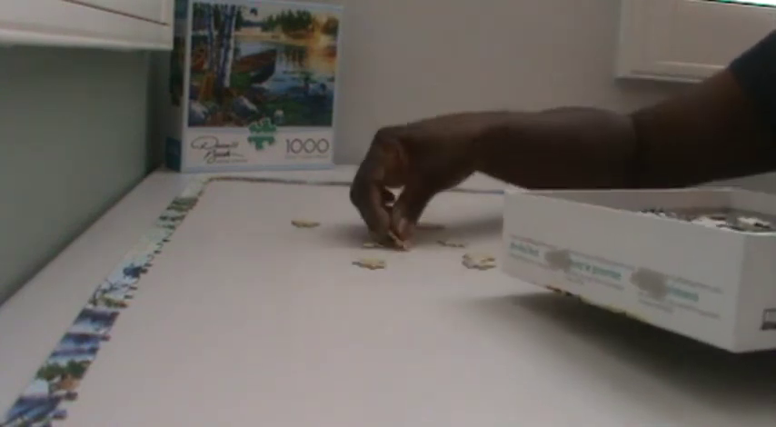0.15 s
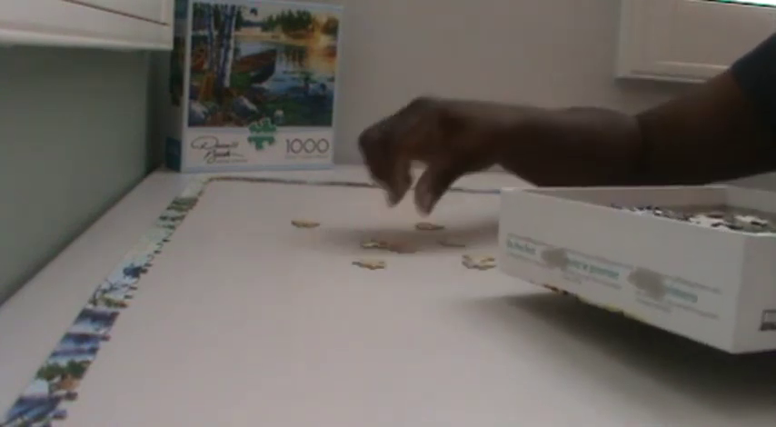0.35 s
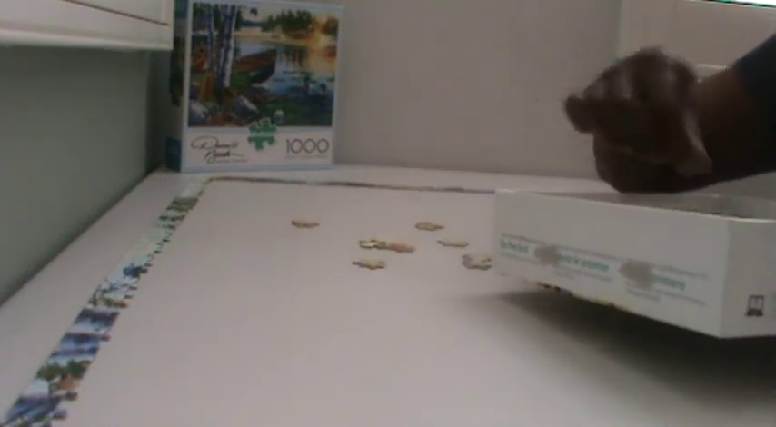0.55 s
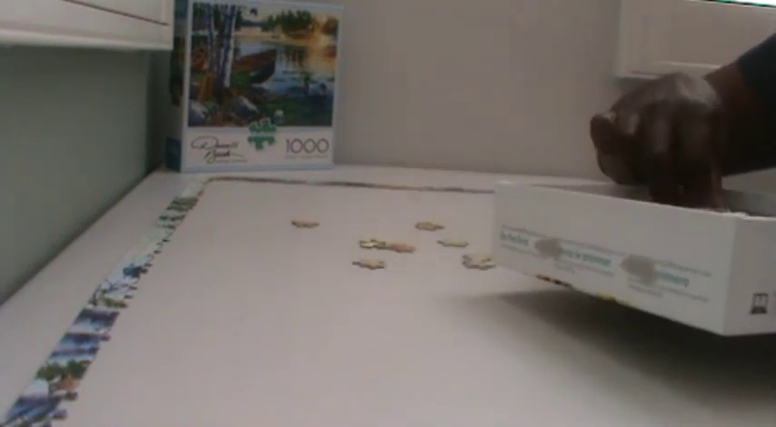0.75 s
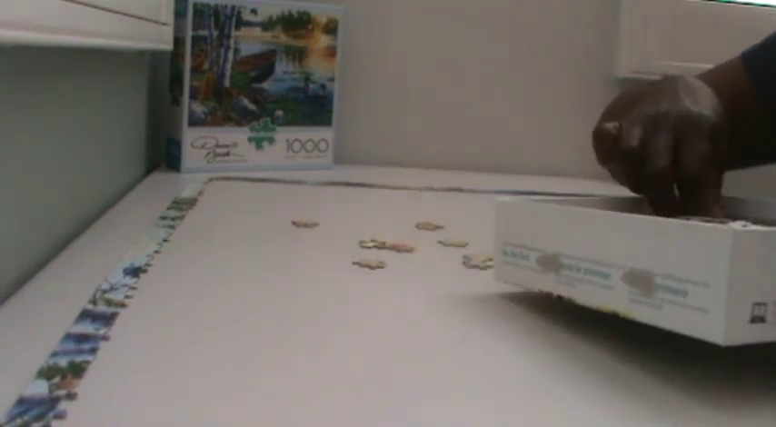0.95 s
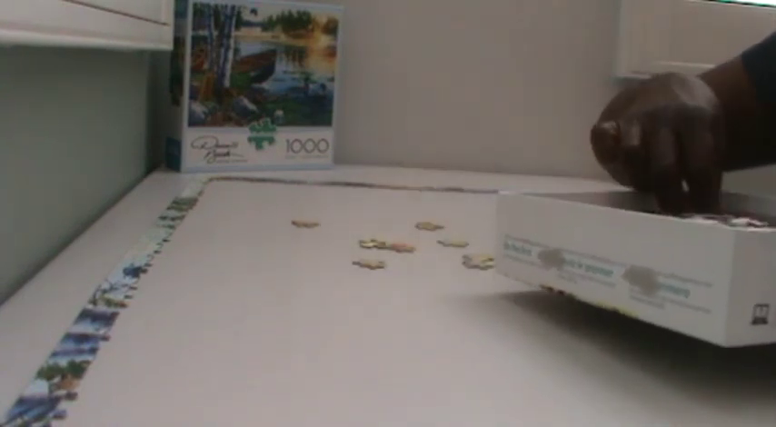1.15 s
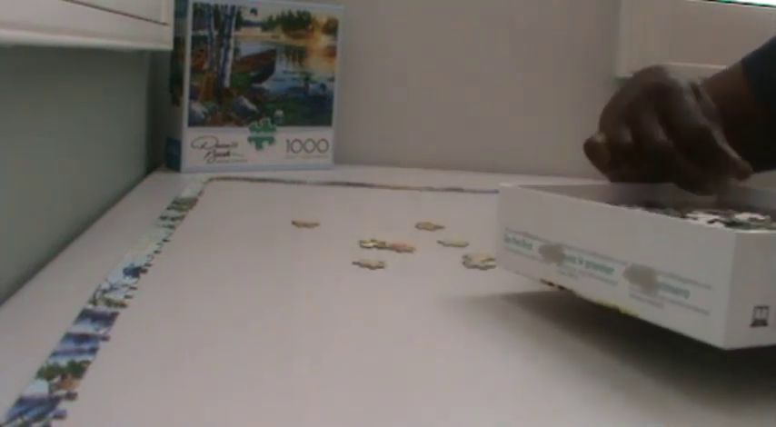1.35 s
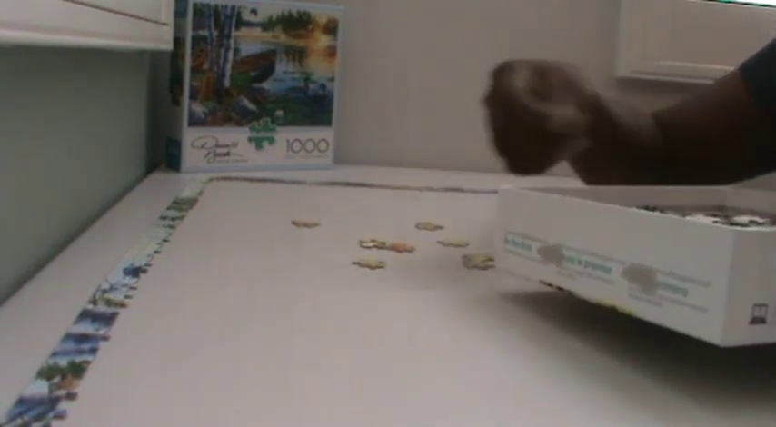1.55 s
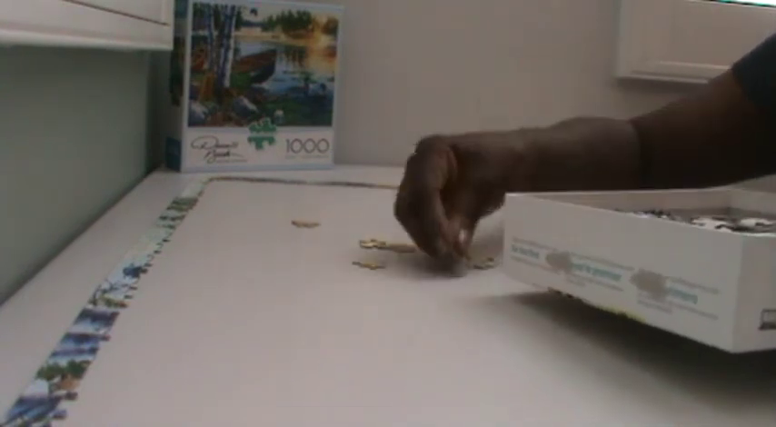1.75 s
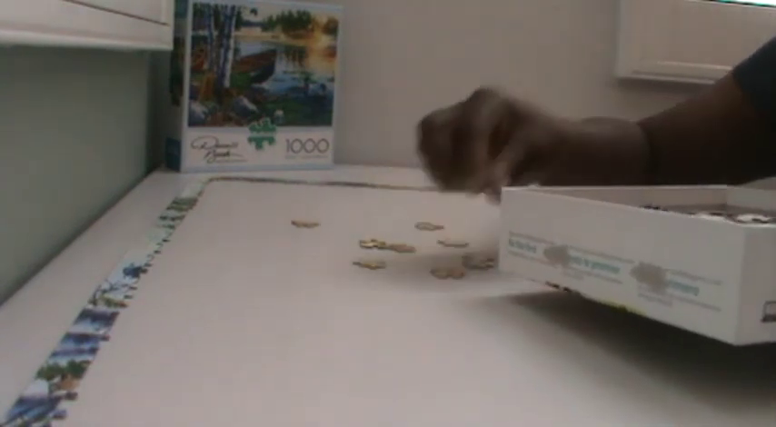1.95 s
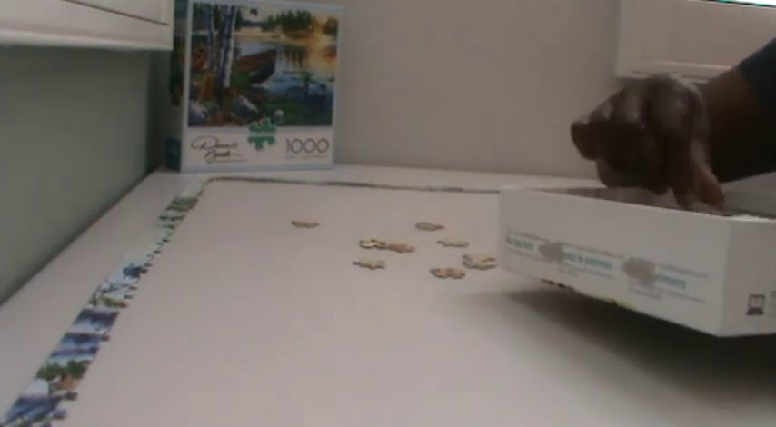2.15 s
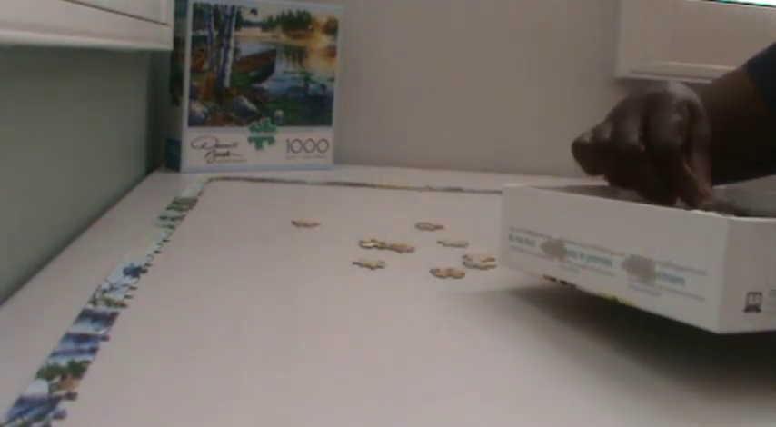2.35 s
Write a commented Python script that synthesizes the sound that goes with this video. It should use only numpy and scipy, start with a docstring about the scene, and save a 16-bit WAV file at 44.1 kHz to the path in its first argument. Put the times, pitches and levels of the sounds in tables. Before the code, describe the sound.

A cardboard jigsaw piece taps, slides and snaps flat on a table with a low knock. Fingers rummage through clicking, rustling pieces in the box, then a second piece snaps down, close by in a small, quiet room.

```python
"""Sorting jigsaw pieces

At a table in a small, quiet room, a cardboard piece twice taps down, slides under the fingers
and snaps flat, making the board boom. In between, the fingers rummage in the box, where loose
pieces click and rustle. Hits are coloured impulses with a dying ring of noise, rubbing is a
stream of tiny slips, and the boom is the table's decaying modes."""
import sys
import numpy as np
from scipy import signal
from scipy.fft import rfft, irfft
from scipy.io import wavfile

SR = 44100
rng = np.random.default_rng(int(sys.argv[2]) if len(sys.argv) > 2 else 0)


def master(y):
    """Save y as 16-bit WAV."""
    cut = np.clip(np.atleast_2d(y).T, -1, 1)
    pcm = np.round(cut * 32767)  # scale
    wavfile.write(sys.argv[1], SR, pcm.astype(np.int16))


N = 105840

# Room tone. Each row: frequency in Hz, level in dB.
HISS_EQ = [(15, -56), (25, -21), (96, -7.5), (235, -10), (352, -5), (425, -14), (527, -10), (620, -16.5),
           (1250, -19.5), (1470, -22), (1780, -19.5), (4210, -23.5), (4570, -27), (4950, -25.5),
           (15800, -26.5)]
# Faint hum. Each row: frequency in Hz, level in dB.
HUM_TONES = [(200, -73), (246, -70), (400, -78), (508, -79.5)]
# Stereo image of the hiss, close hits, snaps and room echo.
# Each row: frequency in Hz, left-right likeness (1 is mono).
HISS_IMAGE = [(60, 0.96), (250, 0.96), (700, 0.11), (3000, 0.067), (9000, 0.99)]
CLOSE_IMAGE = [(100, 1), (400, 1), (1500, 0.54), (5000, 0.15), (11000, 1)]
SNAP_IMAGE = [(100, 0.75), (500, 0.11), (1500, 0.26), (5000, 0.26), (11000, 0.74)]
ROOM_IMAGE = [(60, 1), (150, 0.91), (300, 0.82), (600, 0.048), (2000, 0.16), (8000, 0.32), (12000, 1)]
# The room's decay. Each row: frequency in Hz, time to fall 60 dB in seconds.
ROOM_DECAY = [(60, 0.67), (160, 0.99), (420, 0.5), (1100, 0.61), (2900, 0.54), (6000, 0.5), (9000, 0.41),
              (15000, 0.42)]
# Tone of the room's echo. Each row: frequency in Hz, gain in dB.
ROOM_EQ = [(60, 15.5), (300, -12), (800, 3.5), (1600, -8.5), (2500, -1.5), (4500, -0.5), (7000, -1.5),
           (10000, 3), (15000, -16)]

# A piece's edge meets the table.
# Each row: start in seconds, level in dB, pitch ratio, treble cutoff in Hz, low knock in dB.
EDGE_TAPS = [(0.218, 0, 1, 11900, -11.5), (0.2242, -11, 0.77, 2600, -7), (0.2621, -18, 0.62, 6050, -14),
             (0.2961, -14, 1, 2900, -12), (0.3212, -6, 1.16, 10000, -6.5),
             (1.8572, -10.5, 1.027, 2400, -6.5), (1.9099, -3, 1, 4200, -8.5)]
# Fingertips land on the board. Each row: start in seconds, level in dB.
FINGER_THUDS = [(0.221, -14), (0.231, -10), (0.276, -9), (0.302, -4), (1.859, -12), (1.903, -12)]
# Fingers slide a piece. Each row: start and length in seconds, level in dB, treble cutoff in Hz.
PIECE_SLIDES = [(0.224, 0.11, -41, 8000), (0.25, 0.0447, -36.5, 8000), (1.863, 0.05, -39, 7000)]
# Tone of the tap, the table's knock, the thud and the slide. Each row: frequency in Hz, gain in dB.
TAP_EQ = [(200, -48), (800, -25), (1300, -13), (1800, -2), (2220, 11.5), (2550, -7.5), (2880, 6),
          (3400, -5), (4000, -6.5), (5800, -24), (7400, -16), (8800, -30), (16000, -35)]
KNOCK_EQ = [(40, -20.5), (100, -13.5), (180, 5), (300, -1.5), (420, -12.5), (540, 9), (700, -2), (1000, -2),
            (1700, 2), (2600, -14), (8000, -55)]
THUD_EQ = [(30, -21), (60, -15), (100, -1.5), (180, 2), (300, 1), (500, -14.5), (1500, -60), (8000, -82)]
SLIDE_EQ = [(40, -31), (100, -5), (170, -3.5), (370, 1), (600, -23), (900, -27), (2100, -16.5), (3000, -22),
            (4200, -32), (8000, -25), (16000, -58)]

# A piece snaps flat. Each row: start in seconds, then crack, room tail and low knock in dB.
SNAP_HITS = [(0.3290, 6.5, 6, 0), (1.9167, 5.5, 4, -1)]
# Tone of the snaps. Each row: frequency in Hz, gain in dB for the first piece and for the second.
SNAP_EQ = [(200, -11.5, -22.5), (630, -4.5, -3), (784, -17, -14), (1420, -14, -8.5), (1554, -12.5, 0),
           (2110, 3.5, 2), (2460, 0, 6), (3150, -0.5, 1), (3250, -5, -1), (5100, -12, -7.5),
           (6030, -9.5, -0.5), (7940, -16.5, -5.5), (11170, -18.5, -10.5), (15000, -44, -17.5)]
# Extra colour on a snap's room tail. Each row: frequency in Hz, gain in dB.
SNAP_TAIL_EQ = [(60, -3), (300, 2.5), (600, 2.5), (1000, 12), (1600, 5), (2100, 2), (2500, -6), (3000, -3),
                (4500, 4.5), (6500, 0), (10000, -4.5), (15000, -14.5)]
# Modes of the table. Each row: frequency in Hz, time to fall 60 dB in seconds,
# level in dB when struck at the first spot and at the second.
BOARD_MODES = [(75, 0.76, -51, -38), (91.8, 0.64, -35, -64), (110.3, 0.29, -40, -39),
               (135, 0.35, -37.5, -31), (154.7, 0.35, -25, -35.5), (166.9, 0.43, -32, -32),
               (192.5, 0.405, -35.5, -39), (217.7, 0.33, -35, -32.5), (365, 0.2, -34.5, -40),
               (443.3, 0.29, -30.5, -44), (555, 0.14, -23.5, -57), (1706, 0.11, -22, -23.5),
               (1895, 0.49, -35.5, -49), (2040, 0.7, -37, -52), (2120, 0.56, -38, -46),
               (2175, 0.67, -54, -44), (2300, 0.35, -51, -40), (2570, 0.5, -60, -48),
               (2970, 0.49, -53, -41.5), (2960, 0.14, -42, -28)]
# Thin, lasting ring of the table top. Each row: frequency in Hz, gain in dB.
SHIMMER_EQ = [(1000, -50), (1850, -37), (2000, -21), (2100, -19), (2200, -26), (2400, -33), (4000, -67.5)]

# Digging in the box. Each row: time in seconds, hollow rustle in dB, dry scrape in dB.
RUMMAGE_FADERS = [(0.746, -99, -79), (0.761, -45, -49.5), (0.805, -55, -61), (0.85, -42.5, -54.5),
                  (0.9, -64, -68.5), (0.95, -46.5, -62.5), (1.0, -57.5, -63), (1.059, -51.5, -56.5),
                  (1.115, -53, -68.5), (1.148, -40, -52), (1.175, -75, -64), (1.25, -63, -68),
                  (1.289, -55.5, -56.5), (1.345, -56.5, -70), (1.421, -75, -71), (1.52, -104, -79)]
# Loose pieces click. Each row: start in seconds, hollow body in dB, its pitch ratio, sharp tick in dB.
LOOSE_CLICKS = [(0.7587, -9.5, 1.03, -21.5), (0.7644, -11.5, 0.91, -26), (0.7723, -17, 0.9, -25.5),
                (0.801, -15.5, 1.03, -33), (0.8178, -14, 1.01, -34), (0.84, -23.5, 1.32, -35),
                (0.845, -18.5, 0.91, -43), (0.854, -24, 1.06, -46), (1.022, -22.5, 0.96, -40),
                (1.047, -52, 0.92, -30), (1.060, -22.5, 0.85, -27), (1.075, -23.5, 1.28, -38),
                (1.137, -14.5, 1.04, -28), (1.144, -18, 1.04, -41), (1.1522, -11, 1, -43),
                (1.2032, -23, 1.05, -48), (1.215, -21, 1.32, -32), (1.2269, -12, 0.873, -30.5),
                (1.3525, -26, 0.94, -17), (1.3589, -16.5, 1.05, -41), (1.406, -21.5, 1.17, -27.5),
                (1.615, -50, 0.71, -31), (1.7624, -17.5, 0.97, -51), (1.8274, -21.5, 0.95, -41)]
# Fingers brush a piece. Each row: start and length in seconds, level in dB.
FINGER_BRUSHES = [(1.605, 0.12, -71), (2.259, 0.057, -58)]
# Tone of the hollow box, dry scrape, sharp tick and thin drag. Each row: frequency in Hz, gain in dB.
BOX_EQ = [(100, -29.5), (330, -20.5), (480, -7.5), (680, -18.5), (950, -11), (1140, -2.5), (1280, -3.5),
          (1450, 4.5), (1750, -11), (1950, -11.5), (2400, -22), (2980, -11), (3600, -23), (8000, -31),
          (16000, -83)]
SCRAPE_EQ = [(500, -38), (2000, 5), (3000, -4), (4800, -5.5), (7000, 0.5), (8200, 2.5), (9200, 1.5),
             (10500, -9.5), (16000, -39)]
TICK_EQ = [(500, -10), (1900, -13), (3000, -14), (4000, 1), (4800, -6.5), (5600, -0.5), (7000, -9),
           (8600, 7.5), (10500, -11), (16000, -15)]
DRAG_EQ = [(5000, -40), (7700, -12), (9000, 0), (9900, -22), (14000, -46)]


def amp(db):
    """Decibels to gain."""
    return 10 ** (np.asarray(db) / 20)


def curve_at(points, hz):
    """Reads a curve over log frequency."""
    freqs, values = np.transpose(points)
    return np.interp(np.log(hz + 1), np.log(freqs + 1), values)


def unit_energy(x):
    """Scales each channel to an energy of one."""
    return x / np.sqrt(np.sum(x ** 2, axis=1, keepdims=True) + 1e-20)


def unit_rms(x):
    """Scales to an rms of one."""
    return x / np.sqrt(np.mean(x ** 2) + 1e-20)


def add(mix, start, sound):
    """Mixes a sound in at start seconds."""
    part = mix[:, round(start * SR):][:, :sound.shape[1]]
    part += sound[:, :part.shape[1]]


def colour(x, eq, pitch=1, top_hz=SR):
    """Minimum-phase EQ, shifted in pitch; a soft contact excites little above top_hz."""
    hz = abs(np.fft.fftfreq(4096, 1 / SR))
    gain = amp(curve_at(eq, hz / pitch)) / np.sqrt(1 + (hz / top_hz) ** 8)
    response = np.exp(np.conj(signal.hilbert(np.log(gain))))
    taps = np.fft.ifft(response).real[:2048]
    return signal.fftconvolve(x, taps[None], axes=1)[:, :x.shape[1]]


def noise(image, size):
    """White stereo noise, as wide in each band as the image says."""
    mid, side = rfft(rng.standard_normal((2, size)))
    likeness = np.clip(curve_at(image, np.fft.rfftfreq(size, 1 / SR)), -1, 1)
    mid, side = mid * np.sqrt(1 + likeness), side * np.sqrt(1 - likeness)
    return irfft(np.array([mid + side, mid - side]), size) / np.sqrt(2)


def hit(eq, t60, crack, image=CLOSE_IMAGE, pitch=1, top_hz=SR):
    """An impulse (share crack of the energy) and a dense ring dying in t60 seconds, both coloured."""
    t = np.arange(SR) / SR
    ring = unit_energy(noise(image, SR) * amp(-60 * t / t60))
    strike = np.sqrt(1 - crack) * ring + np.sqrt(crack) * (t == 0)
    return unit_energy(colour(strike, eq, pitch, top_hz))


def slips(per_s=4000, spread_db=2.2):
    """Friction: a stream of tiny slips of uneven size."""
    sizes = amp(spread_db * np.minimum(rng.exponential(1, N), 4))
    slipping = rng.random(N) < per_s / SR
    return sizes * slipping * (np.sqrt(2) * rng.standard_normal(N) + rng.standard_normal((2, N)))


def swell(start, length):
    """A half-sine fade in and out, timed in seconds."""
    return np.sin(np.pi * np.clip((np.arange(N) / SR - start) / length, 0, 1))


def room_tone(hiss_db=-59):
    """A steady bed of room noise and hiss with a faint hum."""
    t = np.arange(N) / SR
    hum = sum(amp(db) * np.sqrt(2) * np.sin(2 * np.pi * (hz * t + rng.random())) for hz, db in HUM_TONES)
    return amp(hiss_db) * unit_rms(colour(noise(HISS_IMAGE, N), HISS_EQ)) + hum


def knock():
    """The table's dull answer to a blow."""
    return hit(KNOCK_EQ, t60=0.13, crack=0.017)


def placing():
    """The piece taps the table with its edge, fingertips thud down and rub it along."""
    out = np.zeros((2, N))
    for start, db, pitch, top_hz, knock_db in EDGE_TAPS:
        add(out, start, amp(db) * hit(TAP_EQ, t60=0.024, crack=0.34, pitch=pitch, top_hz=top_hz))
        add(out, start, amp(knock_db) * knock())
    for start, db in FINGER_THUDS:
        add(out, start, amp(db) * hit(THUD_EQ, t60=0.12, crack=0.59))
    for start, length, db, top_hz in PIECE_SLIDES:
        size = round(length * SR)
        rub = colour(slips(per_s=4500), SLIDE_EQ, top_hz=top_hz)[:, :size]
        add(out, start, amp(db) * unit_rms(rub) * signal.windows.tukey(size, 0.5))
    return out


def room_tail(rise_s=0.00093):
    """The room's echo of one impulse: it builds quickly and dies at its own speed in each band."""
    hz, frame_s, bands = signal.stft(noise(ROOM_IMAGE, SR), SR, nperseg=256)
    decay = amp(-60 * frame_s / curve_at(ROOM_DECAY, hz)[:, None])
    echo = signal.istft(bands * decay, SR, nperseg=256)[1]
    t = np.arange(echo.shape[1]) / SR
    return unit_energy(echo * (1 - np.exp(-(t / rise_s) ** 2)))


def reverb(x, top_hz=SR):
    """The diffuse echo of a sound in the room, dull above top_hz."""
    response = colour(room_tail(), ROOM_EQ, top_hz=top_hz)
    return signal.fftconvolve(x.mean(0)[None], response, axes=1)[:, :N]


def snaps(reflection_s=0.000963, reflection_db=-5, knock_lag_s=0.002885):
    """The piece cracks down flat, a close echo off the table follows about a millisecond later, then it knocks
    the board and wakes the room."""
    out = np.zeros((2, N))
    for piece, (start, db, tail_db, knock_db) in enumerate(SNAP_HITS):
        eq = [(hz, gains[piece]) for hz, *gains in SNAP_EQ]
        for lag, drop_db in [(0, 0), (reflection_s, reflection_db)]:
            add(out, start + lag, amp(db + drop_db) * hit(eq, t60=0.018, crack=0.47, image=SNAP_IMAGE))
        tail = colour(colour(room_tail(), SNAP_TAIL_EQ), eq)
        add(out, start, amp(tail_db) * unit_energy(tail))
        add(out, start + knock_lag_s, amp(knock_db) * knock())
    return out


def board_boom(rise_s=0.0016, shimmer_db=-6.5):
    """Each snap rings the board's modes from its own spot; the first also leaves a thin shimmer."""
    out, t = np.zeros((2, N)), np.arange(SR) / SR
    attack = 1 - np.exp(-t / rise_s)
    for spot, (start, *_) in enumerate(SNAP_HITS):
        for hz, t60, *spot_db in BOARD_MODES:
            # A phase gap between left and right gives the mode its width.
            gap = np.arccos(np.clip(curve_at(ROOM_IMAGE, hz), -1, 1))
            phase = 2 * np.pi * rng.random() + np.array([[0.5], [-0.5]]) * gap * rng.choice([-1, 1])
            fade = amp(spot_db[spot] - 60 * t / t60)
            add(out, start, fade * attack * np.sin(2 * np.pi * hz * t + phase))
    shimmer = hit(SHIMMER_EQ, t60=0.94, crack=0, image=ROOM_IMAGE)
    add(out, SNAP_HITS[0][0], amp(shimmer_db) * shimmer)
    return out


def scratches(step_s=0.008, spread_db=3.5):
    """Edges catch and let go, so the scraping comes in short, uneven scratches."""
    steps = np.arange(0, N / SR, step_s)
    catch = amp(spread_db * np.interp(np.arange(N) / SR, steps, rng.standard_normal(len(steps))))
    return unit_rms(colour(catch * slips(), SCRAPE_EQ))


def rummaging():
    """Pieces rustle and scrape in the hollow box; later the fingers lightly brush a piece."""
    t = np.arange(N) / SR
    times, rustle_db, scrape_db = np.transpose(RUMMAGE_FADERS)
    rustle, scrape = unit_rms(colour(slips(), BOX_EQ)), scratches()
    out = amp(np.interp(t, times, rustle_db)) * rustle + amp(np.interp(t, times, scrape_db)) * scrape
    out *= (t > times[0]) & (t < times[-1])
    for start, length, db in FINGER_BRUSHES:
        out += amp(db) * swell(start, length) * (scrape + amp(-1.5) * rustle)
    return out


def box_clicks(soft_hz=4300, db_per_octave=28, shape_spread_db=4):
    """Loose pieces collide: a sharp tick on top of the cardboard box's hollow body."""
    out, hz = np.zeros((2, N)), np.geomspace(500, 16000, 60)
    for start, body_db, pitch, tick_db in LOOSE_CLICKS:
        # The weaker the tick against the body, the softer and duller the contact.
        top_hz = soft_hz * 2 ** ((tick_db - body_db) / db_per_octave)
        add(out, start, amp(body_db) * hit(BOX_EQ, t60=0.023, crack=0.25, pitch=pitch, top_hz=top_hz))
        # Every piece has its own shape, so its own peaks and dips.
        piece_db = curve_at(TICK_EQ, hz) + shape_spread_db * rng.standard_normal(len(hz))
        add(out, start, amp(tick_db) * hit(np.transpose([hz, piece_db]), t60=0.024, crack=0.095))
    return out


def drag(start_s=1.5, length_s=0.09, db=-55.5):
    """One piece drags over another with a thin, high rasp."""
    return amp(db) * swell(start_s, length_s) * unit_rms(colour(slips(), DRAG_EQ))


def scene(table_send_db=-3.5, box_send_db=-4.5):
    """Table and box share one room; little of the box's treble reaches the echo."""
    table = placing()
    box = box_clicks() + rummaging() + drag()
    echo = amp(table_send_db) * reverb(table) + amp(box_send_db) * reverb(box, top_hz=7000)
    return snaps() + table + box + board_boom() + echo + room_tone()


def record(dry):
    """A steep low-pass trims the air above 16.5 kHz."""
    lowpass = signal.firwin(255, 16500, window=("kaiser", 9), fs=SR)
    return signal.oaconvolve(dry, lowpass[None], "same")


dry = scene()
out = record(dry)
master(out)
```